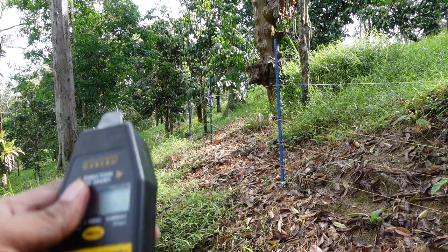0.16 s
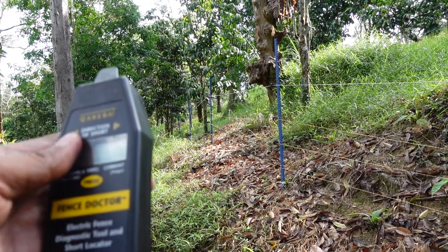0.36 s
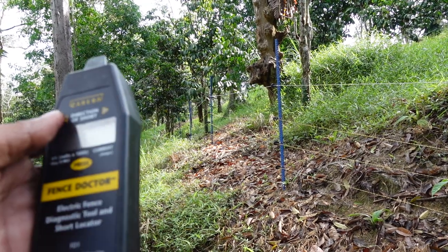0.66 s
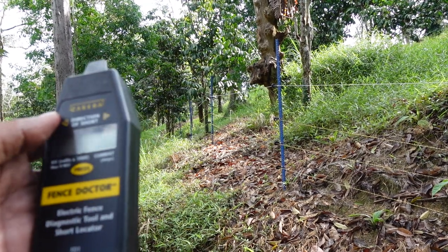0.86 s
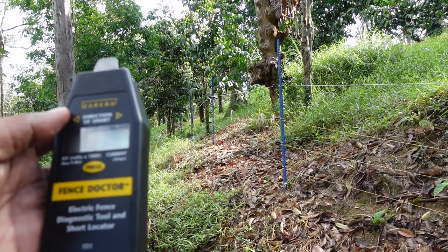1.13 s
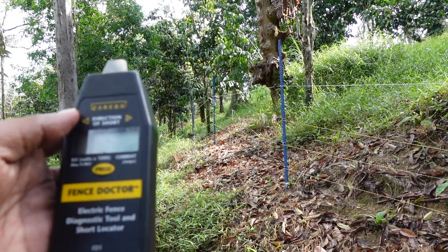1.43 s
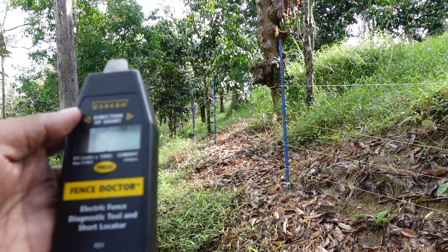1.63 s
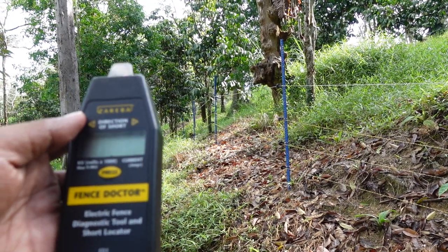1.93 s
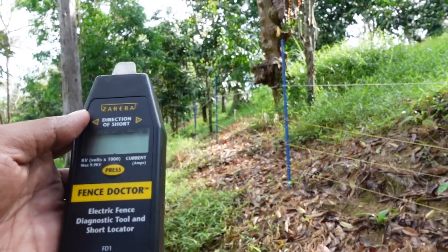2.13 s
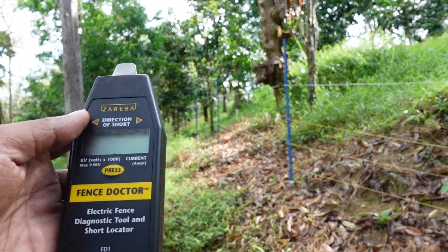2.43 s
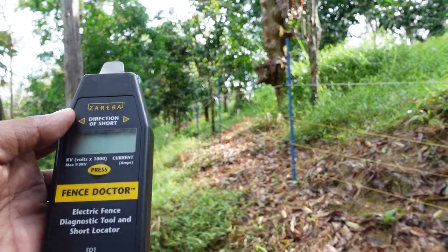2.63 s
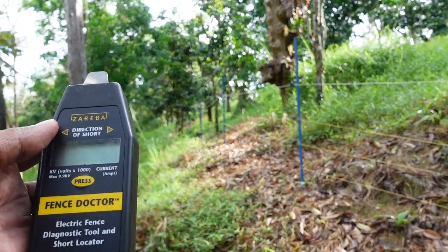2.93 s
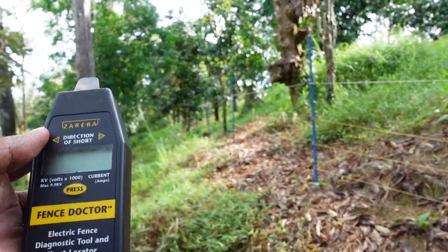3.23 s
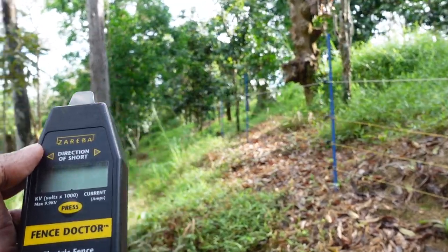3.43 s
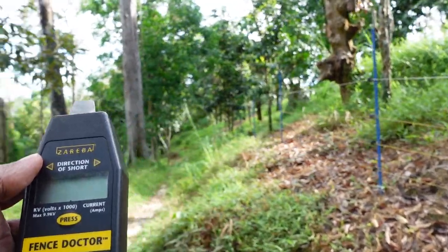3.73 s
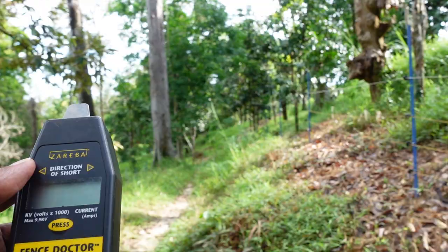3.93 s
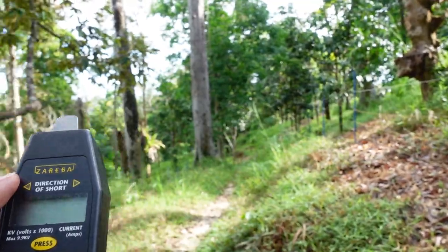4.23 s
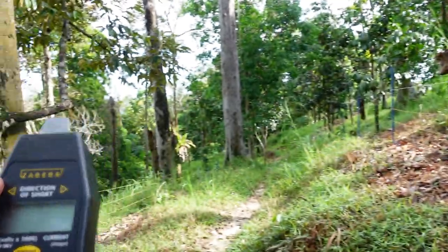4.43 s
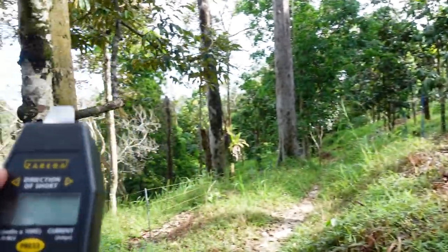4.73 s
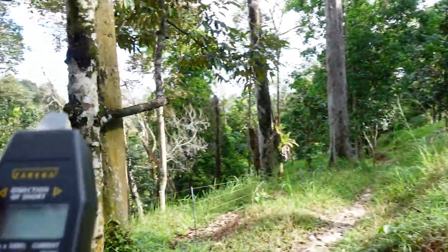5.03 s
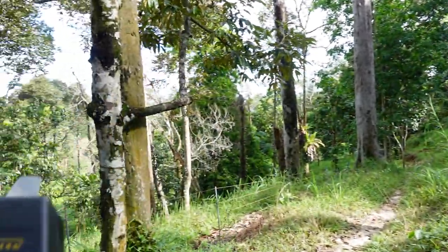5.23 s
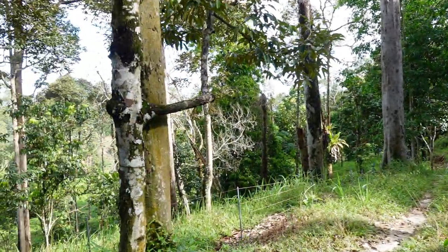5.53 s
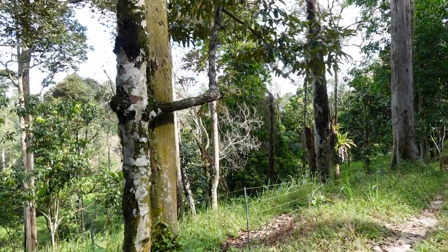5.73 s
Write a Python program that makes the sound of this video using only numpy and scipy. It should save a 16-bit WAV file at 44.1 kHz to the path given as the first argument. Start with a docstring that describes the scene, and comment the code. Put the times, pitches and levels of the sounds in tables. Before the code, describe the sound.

Crickets and a swelling insect buzz fill a hillside grove while birds call briefly; plastic clicks, then leaf rustle and a cloth swish near the end.

```python
"""A wooded hillside orchard: a steady insect chorus (shaped noise), a near cricket whose chirps are paired
strokes on a steady beat, and an insect that buzzes in swells (pulses ringing a resonator).
Birds are gliding near-sines: a slow far whistle, one low note, sharp near chirps down and up, thin calls.
The hand-held camera adds bumps, clicks, taps, snaps and rubs (struck modes and short tones); cloth and dry
leaves are swelling noise. Open air lies beneath, and a faint low drone of noise and tones comes in late."""
import sys
import numpy as np
from scipy import signal
from scipy.fft import rfft, irfft, next_fast_len
from scipy.io import wavfile
from scipy.ndimage import uniform_filter1d

SR = 44100
rng = np.random.default_rng(int(sys.argv[2]) if len(sys.argv) > 2 else 0)


def pcm_store(signal):
    """Save signal as 16-bit PCM."""
    levels = np.round(np.clip(np.atleast_2d(signal), -1, 1) * 32767)
    wavfile.write(sys.argv[1], SR, levels.astype(np.int16).T)


N = 258867
TIME = np.arange(N) / SR


def amp(db):
    """Decibels to gain."""
    return 10 ** (np.asarray(db) / 20)


def unit(x):
    """Scales to an rms of one."""
    return x / np.sqrt(np.mean(x ** 2) + 1e-20)


def over_hz(points, hz):
    """Reads a table on a log-frequency axis."""
    f, value = np.transpose(points)
    return np.interp(np.log(hz + 1), np.log(f + 1), value)


def over_time(points):
    """Reads a curve at every sample."""
    return np.interp(TIME, *np.transpose(points))


def swells(rows):
    """Smooth rises and falls of level in dB; each row: top in s, half length in s, height in dB."""
    return sum(db * np.cos(np.pi / 2 * np.clip((TIME - s) / half, -1, 1)) ** 2 for s, half, db in rows)


def add(mix, s, sound):
    """Mixes a sound in at time s."""
    part = mix[max(round(s * SR), 0):][:len(sound)]
    part += sound[:len(part)]


def drift(rate_hz):
    """Slow random curve of rms one, low-passed near rate_hz."""
    spectrum = rfft(rng.standard_normal(N))
    return unit(irfft(spectrum * np.exp(-(np.fft.rfftfreq(N, 1 / SR) / rate_hz) ** 2), N))


def noise(spectrum, likeness):
    """Coloured stereo noise of rms one; likeness is the left-right correlation, a number or a table over Hz."""
    hz = np.fft.rfftfreq(N, 1 / SR)
    common, apart = rfft(rng.standard_normal((2, N))) * amp(over_hz(spectrum, hz))
    same = np.clip(likeness if np.isscalar(likeness) else over_hz(likeness, hz), -1, 1)
    mid, side = common * np.sqrt(1 + same), apart * np.sqrt(1 - same)
    return unit(irfft(np.array([mid + side, mid - side]), N))


def balance(left_db):
    """Gains of the two channels, left over right by left_db."""
    return amp([[left_db / 2], [-left_db / 2]])


def place(x, left_db, lead_rad):
    """A point source: a level difference and a phase lead of the left channel."""
    analytic = signal.hilbert(x, next_fast_len(N))[:N]
    turn = np.exp(.5j * lead_rad * np.array([[1], [-1]]))
    return (analytic * turn).real * balance(left_db)


def ring(x, hz, width_hz):
    """A one-pole complex resonance, gain about one at its peak."""
    r = np.exp(-np.pi * width_hz / SR)
    return 2 * signal.lfilter([1 - r], [1, -r * np.exp(2j * np.pi * hz / SR)], x).real


def woods(x, likeness, size=50000):
    """Trunks and leaves scatter a sound into sparse echoes that decay at a rate set by frequency."""
    # Decay time of the echoes. Each row: frequency in Hz, t60 in s.
    decay_t60 = [(500, 0.43), (2500, 1.04), (3500, 1.17), (5500, 0.93), (9000, 1.1)]
    taps = rng.standard_normal((2, size)) * (rng.random((2, size)) < 4000 / SR)  # 4000 echoes per s
    hz, t, z = signal.stft(taps, SR, nperseg=256)
    z *= amp(-60 * t / over_hz(decay_t60, hz)[:, None]) * (1 - np.exp(-t / 0.0012))
    mid, side = signal.istft(z, SR, nperseg=256)[1]
    same = np.clip(likeness, -.99, .99)
    side = side * np.sqrt((1 - same) / (1 + same))
    tail = np.array([mid + side, mid - side])
    return signal.fftconvolve(x[None], tail / np.linalg.norm(tail[0]), axes=1)[:, :N]


def wavering_sine(hz, waver):
    """A sine along a pitch curve in Hz, with random pitch wobble of rms waver (fraction of pitch)."""
    wobble = unit(uniform_filter1d(rng.standard_normal(len(hz)), size=120))
    return np.sin(2 * np.pi * np.cumsum(hz * (1 + waver * wobble)) / SR)


def note(length_s, level_db, pitches_hz, waver=.003, lean=1, fullness=1):
    """A gliding near-sine; lean under 1 peaks early, fullness under 1 holds the level longer."""
    u = np.linspace(0, 1, int(length_s * SR))
    count = len(pitches_hz)
    hz = np.polyval(np.polyfit(np.linspace(0, 1, count), pitches_hz, count - 1), u)
    envelope = abs(np.sin(np.pi * u ** lean)) ** fullness
    return amp(level_db) * unit(wavering_sine(hz, waver) * envelope)


def open_air():
    """Low and middle noise, less alike left to right as frequency rises, its level unsteady."""
    # Colour of the air. Each row: frequency in Hz, relative level in dB per Hz.
    air_colour = [(20, -40), (50, -31), (108, -12), (172, -14), (260, -8.5), (370, -6.5), (480, -2.5),
                  (600, -5.5), (700, -11.5), (1250, -12.5), (1650, -14.5), (2200, -18.5), (2900, -53)]
    # Likeness of the channels. Each row: frequency in Hz, correlation 0-1.
    air_likeness = [(50, 1), (200, 0.26), (380, 0.19), (700, 0), (1300, 0), (3000, 0)]
    # Each row: top in s, half length in s, height in dB.
    air_swells = [(0, 0.46, 6.5), (4.58, 0.34, 2.5), (5.87, 1, 3.5)]
    level_db = -52 + swells(air_swells) + 1.64 * drift(23.5)
    return noise(air_colour, air_likeness) * amp(level_db) * balance(1)


def far_foliage():
    """A faint, wide hiss of noise."""
    # Colour of the foliage. Each row: frequency in Hz, relative level in dB per Hz.
    foliage_colour = [(100, -52), (900, 0), (1600, -34), (2500, 4), (4000, 0.5), (8000, -38), (16000, -26)]
    return amp(-60.0) * noise(foliage_colour, 0.018)


def low_drone():
    """Low noise with tones that waver slowly in pitch and level."""
    # Colour of the noise. Each row: frequency in Hz, relative level in dB per Hz.
    drone_colour = [(40, -42), (85, -17), (110, -5), (135, -3), (190, -4), (245, -7), (330, -9.5),
                    (600, -24)]
    # Tones within it. Each row: mean frequency in Hz, relative level in dB.
    drone_tones = [(108, -7), (135, 0), (190, -6.5), (243, -1), (275, -2)]
    # Its entry. Each row: time in s, level in dB.
    drone_level = [(3.6, -75), (3.95, -55), (4.3, -61.5), (4.7, -51), (5.87, -54.5)]
    hum = np.zeros(N)
    for hz, db in drone_tones:
        phase = 2 * np.pi * np.cumsum(hz * (1 + 0.01507 * drift(5.9))) / SR
        hum += amp(db + 3.5 * drift(3.9)) * np.sin(phase)
    return (.75 * noise(drone_colour, .96) + .65 * unit(hum)) * amp(over_time(drone_level))


def chorus():
    """Countless far insects merge into a shrill, gently throbbing band of noise."""
    # Colour of the massed insects. Each row: frequency in Hz, relative level in dB per Hz.
    chorus_colour = [(1500, -69), (4000, -70), (5300, -18.5), (5800, -14), (6300, -3), (6650, -0.5),
                     (7000, 0.5), (7350, -6.5), (7650, -8), (8000, -12), (8500, -53), (9400, -38),
                     (10500, -17.5), (11800, -38.5), (13900, -26.5), (16000, -38)]
    # Each row: top in s, half length in s, height in dB.
    chorus_swells = [(3.25, 0.52, 0), (5.3, 0.73, 2)]
    level_db = -38.5 + swells(chorus_swells) + 0.5 * drift(15)
    return noise(chorus_colour, 0.55) * amp(level_db) * balance(-0.55)


def buzzer():
    """Pulses in groups of three ring near 5 kHz, swell, hold and fade; others of its kind blur behind."""
    # Swells, about one a second. Each row: middle of the hold in s, level in dB before the mix gains.
    buzz_swells = [(-.01, -45.5), (1.13, -47.5), (2.34, -47), (3.5, -49), (4.58, -47), (5.75, -46)]
    hold_s, rise_db_per_s, fall_db_per_s, rest_db = 0.15, 64, 110, -63.5
    pulse_hz, resonator_hz = 72.9, 4892  # means
    stress_db, sharpness = 3.5, 0.99  # stress of every third pulse, peakedness of each
    effort = amp(rest_db)
    for s, db in buzz_swells:
        early_s = np.maximum(s - hold_s / 2 - TIME, 0)
        late_s = np.maximum(TIME - s - hold_s / 2, 0)
        effort = np.maximum(effort, amp(db - rise_db_per_s * early_s - fall_db_per_s * late_s))
    turns = np.cumsum(pulse_hz * (1 + .01 * drift(18))) / SR
    stress = amp(stress_db * np.cos(2 * np.pi * turns / 3))
    pulses = np.exp(sharpness * np.cos(2 * np.pi * turns)) * stress
    tone = np.sin(2 * np.pi * np.cumsum(resonator_hz * (1 + .02 * drift(159))) / SR)
    near = unit(pulses * tone) * effort
    # Each row: frequency in Hz, relative level in dB per Hz.
    far_colour = [(2500, -70), (3800, -62), (4350, -3.5), (4650, 7.0), (4950, 4.0), (5300, -19), (5900, -56)]
    far = amp(-52.0) * noise(far_colour, 0.4)
    return amp(-2.0) * place(near, -1.6, 0) + amp(-3.5) * woods(near, .6) + far


def strokes(chirps, gap_s=.049, length_s=.034):
    """Two wing strokes a chirp, each sagging in pitch."""
    out = np.zeros(N)
    for s, db in chirps:
        for middle_s in (s, s + gap_s):
            stroke = note(length_s, db - 5.5, (7630, 7510, 7400), waver=0.005)
            add(out, middle_s - length_s / 2, stroke)
    return out


def cricket():
    """A cricket close on the right strokes its wings in runs; a fainter neighbour keeps its own beat."""
    # Runs on a steady beat. Each row: first chirp in s, last chirp in s, level in dB before the stroke gain.
    cricket_runs = [(.024, 1.109, -35), (1.379, 1.379, -37), (1.818, 2.035, -38), (2.302, 2.519, -36.5),
                    (2.736, 3.17, -36.5), (3.387, 4.255, -37), (4.472, 4.689, -37), (4.907, 4.906, -42)]
    beat_s = .217
    near_chirps = []
    for first_s, last_s, db in cricket_runs:
        near_chirps += [(s, db) for s in np.arange(first_s, last_s + beat_s / 2, beat_s)]
    far_chirps = [(.17 + 0.23 * k + rng.normal(0, .006), -43.5 + rng.normal(0, 1.8)) for k in range(26)]
    near, far = strokes(near_chirps), strokes(far_chirps)
    return place(near, -6.0, 0.35) + place(far, 0.82, 0) + amp(-5.0) * woods(near + far, 0.84)


def rustle():
    """Dry leaves shift a few times as the camera turns: a noise wash with fine decaying crackles."""
    # Colour of the leaves. Each row: frequency in Hz, relative level in dB per Hz.
    leaf_colour = [(60, -40), (250, -5.5), (600, 3), (1200, -2.5), (2200, -1), (4000, 2), (7000, -4),
                   (10000, -7), (16000, -21)]
    # Shifts. Each row: top in s, half length in s, level in dB.
    leaf_shifts = [(0, .32, -52), (4.31, 0.11, -47), (4.556, .07, -43.5), (4.658, 0.12, -45),
                   (5.239, 0.11, -42.5), (5.364, 0.15, -40.5), (5.66, 0.21, -42.5)]
    rest_db, edge_db = -72.5, -17  # edge: drop at the half length
    crackles = (rng.random(N) < 350 / SR) * rng.random(N)  # 350 per s
    grain = 1 + 0.58 * signal.lfilter([1], [1, -np.exp(-1 / (0.0042 * SR))], crackles)
    power = amp(rest_db) ** 2
    for s, half_s, db in leaf_shifts:
        power = power + amp(db + edge_db * abs((TIME - s) / half_s) ** 1.43) ** 2
    return unit(noise(leaf_colour, 0.047) * grain) * np.sqrt(power) * balance(1)


def swish():
    """Cloth brushes in one bright stroke of noise as the arm is lowered."""
    # Colour of the cloth. Each row: frequency in Hz, relative level in dB per Hz.
    cloth_colour = [(500, -22), (3000, -10), (6000, -7), (9500, 1), (13000, 2), (16000, -3)]
    top_s, half_s, top_db = 5.28, 0.13, -45.5
    level_db = top_db - 9 * ((TIME - top_s) / half_s) ** 2 + 1.2 * drift(40)
    return noise(cloth_colour, 0.22) * amp(level_db) * balance(2.1)


def bumps(size=4000):
    """A finger jolts the camera body, ringing a low mode that dies in about 40 ms."""
    # Each row: start in s, peak level in dB, t60 in s, frequency in Hz.
    body_bumps = [(0, -12, 0.038, 339), (3.3984, -35.5, .04, 560)]
    out, t = np.zeros(N), TIME[:size]
    for s, db, t60_s, hz in body_bumps:
        add(out, s, amp(db - 60 * t / t60_s) * np.sin(2 * np.pi * hz * t))
    return out


def click(t, t60_s, hard_db, main_hz, main_db):
    """A gritty knock rings broad case modes, with a clean main ring and a tick of first contact."""
    # Case modes. Each row: frequency in Hz, width in Hz, relative level in dB.
    case_modes = [(342, 210, -6), (580, 200, 1), (1170, 740, -2.5)]
    # Upper modes, scaled by hardness. Each row: frequency in Hz, width in Hz, relative level in dB.
    upper_modes = [(1670, 700, -9), (4300, 930, -0.5)]
    tick_db, tick_decay_s, main_t60_s = -10, 0.0017, 0.027
    grit = (6 * (t == 0) + rng.standard_normal(len(t))) * amp(-60 * t / t60_s)
    knock = np.zeros(len(t))
    for hz, width_hz, mode_db in case_modes:
        knock += amp(mode_db) * ring(ring(grit, hz, width_hz), hz, width_hz)
    for hz, width_hz, mode_db in upper_modes:
        knock += amp(hard_db + mode_db) * ring(ring(grit, hz, width_hz), hz, width_hz)
    contact = np.diff(rng.standard_normal(len(t)), prepend=0) * np.exp(-t / tick_decay_s)
    tick = ring(contact, 1000, 1800)
    tick = amp(tick_db + min(hard_db, 0) / 2) * tick / abs(tick).max()
    main = amp(main_db - 60 * t / main_t60_s) * np.sin(2 * np.pi * main_hz * t)
    return knock / abs(knock).max() + main + tick


def handling(size=4000):
    """Clicks and soft taps ring the plastic case, snaps ring very high, rubbing fingers sound hollow."""
    # Each row: start in s, level in dB, t60 in s, upper-mode level in dB, main ring in Hz, main ring in dB.
    # Levels of clicks and taps are before the mix gain.
    case_clicks = [(0.1443, -28, 0.016, 5, 1380, -6.5), (.271, -33.5, .012, -16, 1150, -5),
                   (.394, -40, 0.012, -24, 1110, 0.5), (.555, -42.5, 0.07, -25, 1160, -1),
                   (0.6183, -38, .012, -4, 1050, -5), (.731, -40, .035, -14, 1080, -3),
                   (2.563, -37.5, .022, 4, 1820, -7), (3.3986, -28, 0.017, -14, 1325, -5.5),
                   (4.533, -39.5, 0.046, -6, 1270, -4), (4.567, -35, .032, 0, 1290, -4),
                   (4.632, -37, 0.019, -6, 744, -2), (5.845, -39, .04, 4, 1730, -1)]
    # Soft round taps. Each row: start in s, length in s, level in dB, frequency in Hz.
    case_taps = [(0.53, 0.016, -51, 1080), (.611, 0.013, -44, 1070), (.727, 0.016, -46.5, 1040)]
    # Sharp snaps. Each row: start in s, peak level in dB before placing.
    case_snaps = [(2.134, -42), (3.395, -10), (4.724, -37)]
    # Soft hollow rubs. Each row: start in s, length in s, level in dB before placing, mean frequency in Hz.
    finger_rubs = [(2.05, 0.054, -40, 520), (3.424, 0.089, -50, 413.4), (4.237, 0.031, -46.5, 505),
                   (4.358, 0.092, -40.5, 479), (5.069, 0.04, -47, 544)]
    t = np.arange(size) / SR
    knocks, snaps, rubs = np.zeros((3, N))
    for s, db, *shape in case_clicks:
        add(knocks, s, amp(db) * click(t, *shape))
    for s, length_s, db, hz in case_taps:
        add(knocks, s, note(length_s, db, (hz, hz), waver=.015))
    for s, db in case_snaps:
        crack = (t == 0) + 0.085 * rng.standard_normal(size) * amp(-60 * t / 0.01)
        snap = ring(ring(crack, 10900, 850), 12300, 1400)
        snap = snap + amp(-15) * ring(ring(crack, 14200, 2000), 14200, 2000)
        add(snaps, s, amp(db) * snap / abs(snap).max())
    for s, length_s, db, hz in finger_rubs:
        add(rubs, s, note(length_s, db, (hz, hz), waver=0.11))
    return amp(-2.0) * place(knocks, 1.6, 0) + place(snaps, 3, -.4) + place(rubs, 1.3, 1.4)


def low_whistler():
    """One soft, low near-sine sinks slowly, with a trail through the trees."""
    out = np.zeros(N)
    add(out, 1.875, note(.38, -59, (1610, 1570, 1520), waver=.013, fullness=.5))
    return place(out, 3.6, 0) + amp(-5) * woods(out, 0.47)


def thin_caller():
    """Very high two-part calls, a rising flick then a lower sinking note."""
    # Each row: start in s, flick level in dB before the mix gains, top of the flick in Hz.
    thin_calls = [(5.049, -38.5, 8440), (5.26, -37.5, 8310), (5.452, -37, 8000), (5.634, -35.5, 7680),
                  (5.82, -32, 7780)]
    flick_s, sink_after_s, sink_s, sink_db = 0.0376, .04, 0.0517, -1
    flick_from, sink_from, sink_to = 0.94, .83, .785  # pitches over the top pitch
    out = np.zeros(N)
    for s, db, hz in thin_calls:
        flick = note(flick_s, db, (hz * flick_from, hz), waver=0.016)
        sink = note(sink_s, db + sink_db, (hz * sink_from, hz * sink_to), waver=0.016)
        add(out, s, flick)
        add(out, s + sink_after_s, sink)
    return amp(-5) * place(out, -10.5, 0) + amp(-7) * woods(out, 0.8)


def whistler():
    """Slow fluted notes from far off, arched glides blurred and trailing through the trees."""
    # Each row: start in s, length in s, level in dB before the mix gains, first, middle and last pitch in Hz,
    # share that arrives straight 0-1.
    whistle_notes = [(.209, .089, -53, 2440, 2360, 2280, .8), (.32, 0.087, -41.5, 2800, 2865, 2874, 1),
                     (.487, 0.15, -42.5, 3030, 3247, 3327, 0.74),
                     (.572, 0.14, -33.5, 3270, 3247, 2900, 0.84),
                     (.803, .118, -37.5, 2550, 2790, 2890, 0.95), (.865, 0.11, -34.5, 2830, 2845, 2596, 1),
                     (.95, 0.096, -40, 2780, 2564, 2266, 1), (1.072, 0.074, -34, 3260, 3310, 3420, 1),
                     (1.093, 0.07, -41, 3850, 3550, 3310, 0), (1.32, .064, -50, 2130, 2270, 2400, 0),
                     (1.348, 0.111, -43, 2376, 2396, 2317, 0.76), (4.621, .12, -59, 3000, 3130, 3320, 0),
                     (4.775, 0.032, -52, 3450, 3520, 3620, 1), (5.482, 0.086, -39, 3250, 3310, 3380, 0.73),
                     (5.51, 0.069, -37, 3750, 3470, 3250, .1), (5.58, .13, -43.5, 3520, 3370, 3220, 0.2),
                     (5.745, 0.084, -45.5, 2150, 2360, 2480, .15)]
    straight, sung = np.zeros((2, N))
    for s, length_s, db, *pitches_hz, share in whistle_notes:
        call = note(length_s, db, pitches_hz, waver=0.007, fullness=.9)
        add(sung, s, call)
        add(straight, s, share * call)
    return amp(-6.0) * place(straight, 3.0, -.1) + amp(-4.5) * woods(sung, 0.71) * balance(0.71)


def up_chirp(length_s, level_db, top_hz, climb_hz_per_s, waver):
    """A climb that starts softly, opens to full voice and levels off at the top."""
    # Voice opens, thins and opens again. Each row: pitch in Hz, relative level in dB.
    up_voice = [(2600, -18), (3600, -9.5), (3850, 2), (4250, 1), (4800, -4), (5400, 1)]
    from_hz, ramp_s = 2600, 0.0076
    t = np.arange(0, length_s, 1 / SR)
    hz = np.minimum(from_hz + climb_hz_per_s * t, top_hz)
    voice = amp(over_hz(up_voice, hz))
    ends = np.minimum(np.minimum(t, length_s - t) / ramp_s, 1)
    return amp(level_db) * unit(voice * ends * wavering_sine(hz, waver))


def chirper():
    """Steep sweeps down and up from a bird close by on the right."""
    # Falling chirps. Each row: start in s, length in s, level in dB before the mix gains, first pitch in Hz,
    # share that arrives straight 0-1, lean (under 1 loudest early).
    down_chirps = [(2.855, 0.026, -31, 5930, 0.1, 0.83), (2.959, 0.031, -30.5, 5690, .2, 0.91),
                   (3.153, .045, -26.5, 6340, 0.94, 0.93), (3.435, .045, -26.5, 6380, 0.92, 0.92)]
    # Rising chirps. Each row: start in s, length in s, level in dB before the mix gains, top in Hz,
    # climb in Hz per s.
    up_chirps = [(3.232, 0.065, -26, 5340, 51800), (3.513, 0.077, -26.5, 5476, 57900)]
    mid_ratio, last_ratio = .76, .49  # pitches over the first
    straight, sung = np.zeros((2, N))
    for s, length_s, db, hz, share, lean in down_chirps:
        pitches_hz = (hz, hz * mid_ratio, hz * last_ratio)
        call = note(length_s, db, pitches_hz, waver=0.02, lean=lean, fullness=1.4)
        add(sung, s, call)
        add(straight, s, share * call)
    for s, *shape in up_chirps:
        call = up_chirp(*shape, waver=.008)
        add(sung, s, call)
        add(straight, s, call)
    # paths through the nearest leaves interfere, so each sweep flutters
    flutter = amp(3.4 * drift(200) - 3)
    return place(straight * flutter, -7.0, -1.73) + amp(-4.0) * woods(sung, 0.7) * balance(-0.89)


def scene():
    """Insects, birds and the near sounds over the open air."""
    background = open_air() + far_foliage() + low_drone()
    insects = chorus() + buzzer() + cricket()
    near_sounds = rustle() + swish() + bumps() + handling()
    birds = low_whistler() + thin_caller() + whistler() + chirper()
    return background + insects + near_sounds + birds


def record(dry):
    """The camera's bass cut at 45 Hz and band limit at 15.9 kHz."""
    bass_cut = signal.butter(2, 45, "high", fs=SR, output="sos")
    band_limit = signal.firwin(511, 15900, window=("kaiser", 9), fs=SR)
    return signal.oaconvolve(signal.sosfilt(bass_cut, dry), band_limit[None], "same")


dry = scene()
out = record(dry)
pcm_store(out)
```